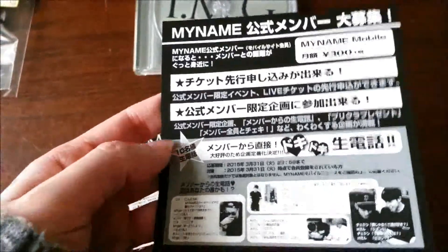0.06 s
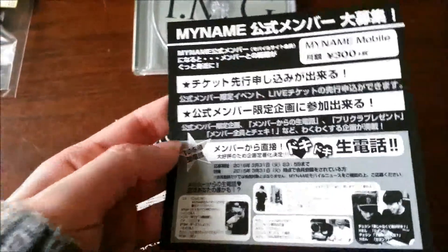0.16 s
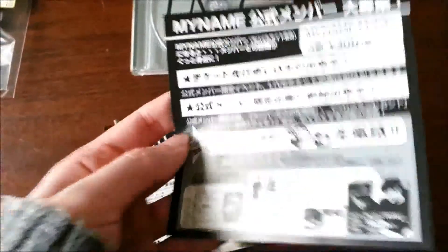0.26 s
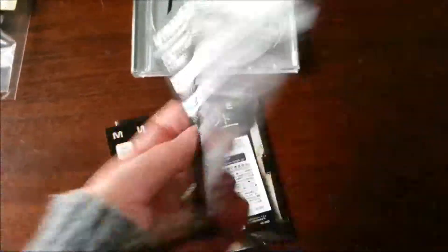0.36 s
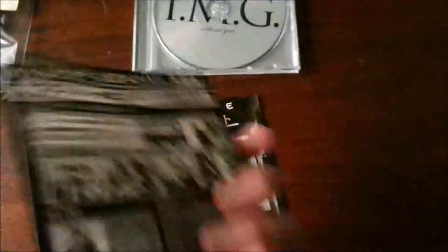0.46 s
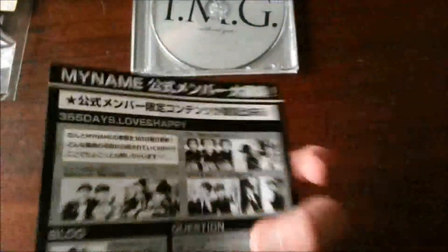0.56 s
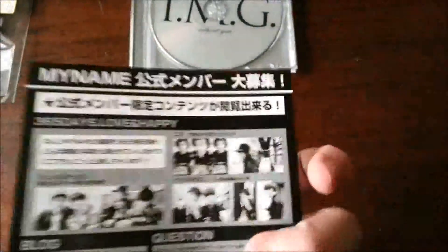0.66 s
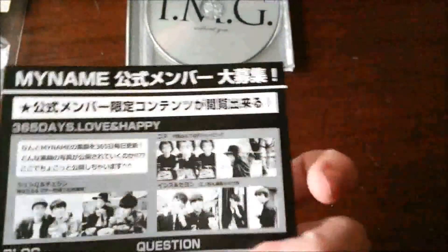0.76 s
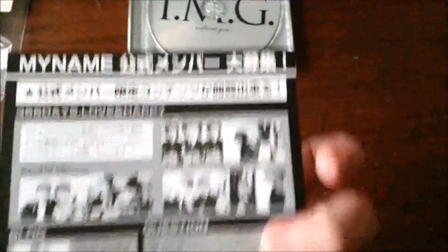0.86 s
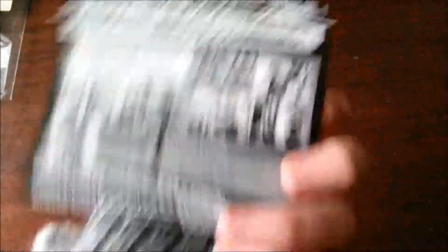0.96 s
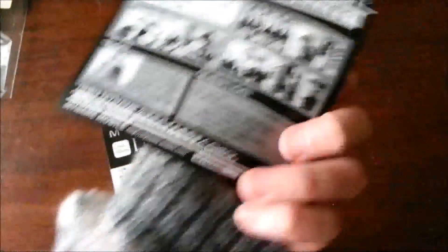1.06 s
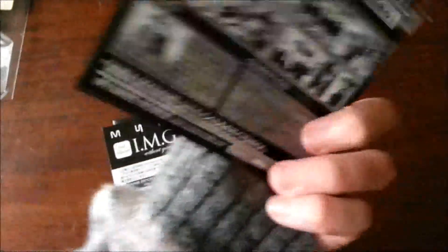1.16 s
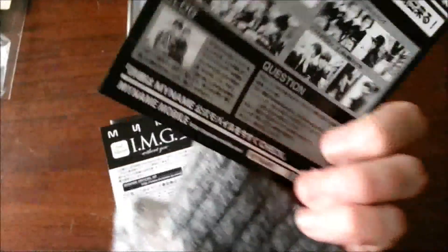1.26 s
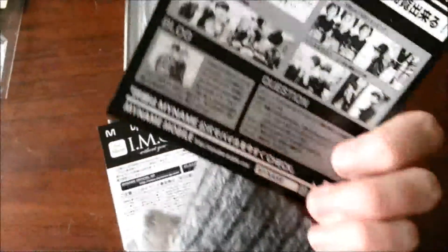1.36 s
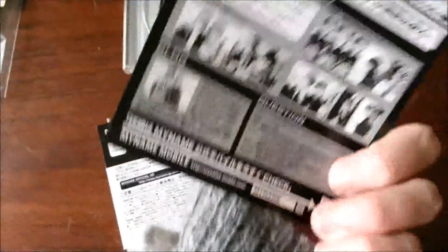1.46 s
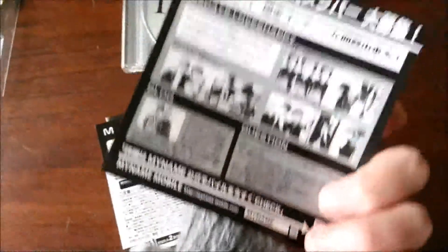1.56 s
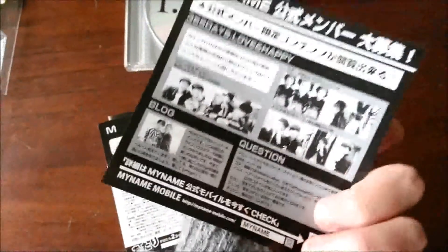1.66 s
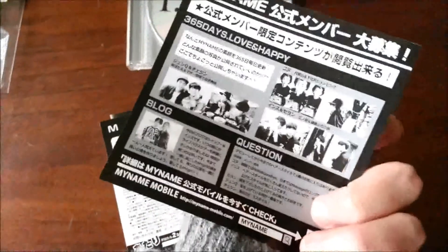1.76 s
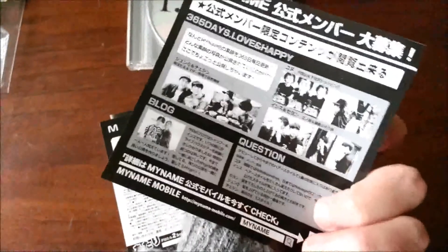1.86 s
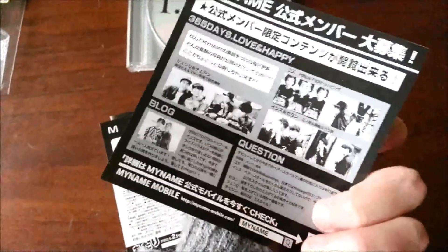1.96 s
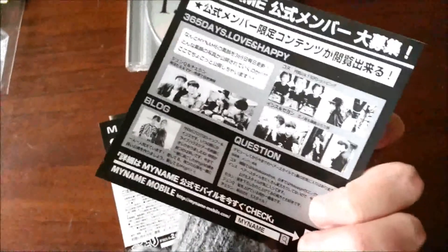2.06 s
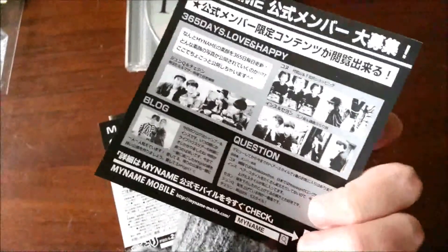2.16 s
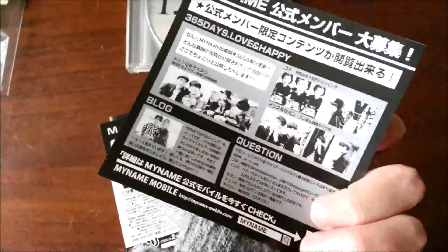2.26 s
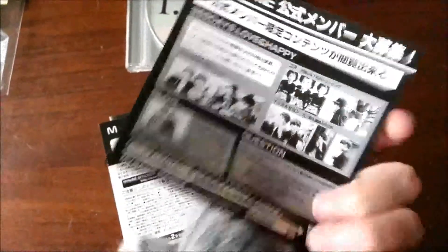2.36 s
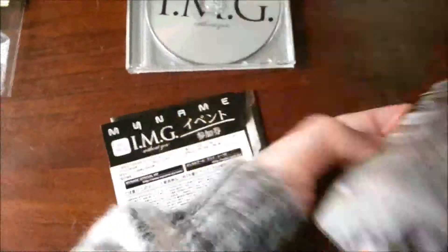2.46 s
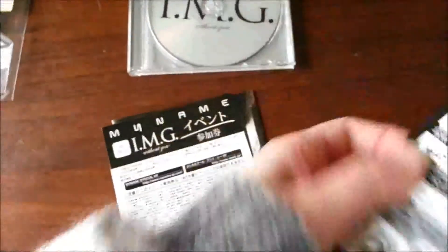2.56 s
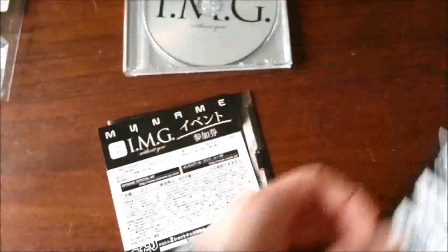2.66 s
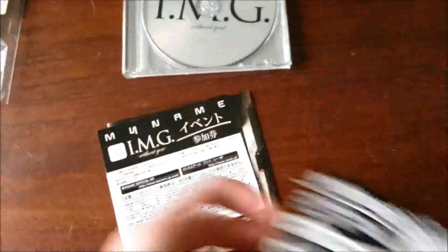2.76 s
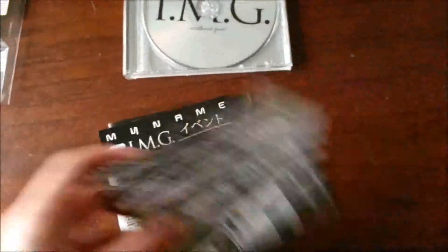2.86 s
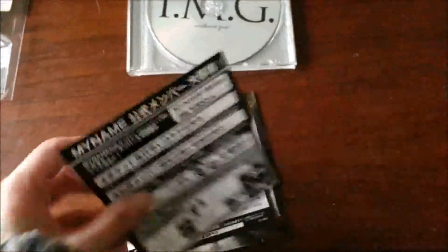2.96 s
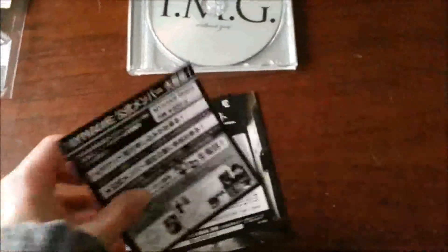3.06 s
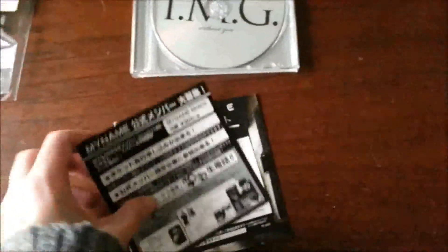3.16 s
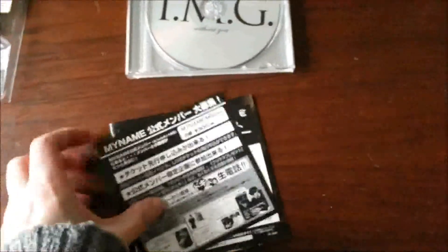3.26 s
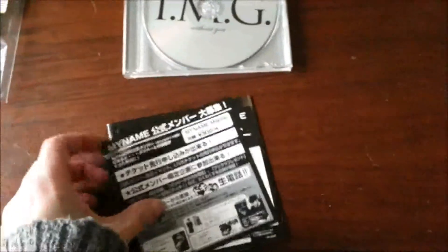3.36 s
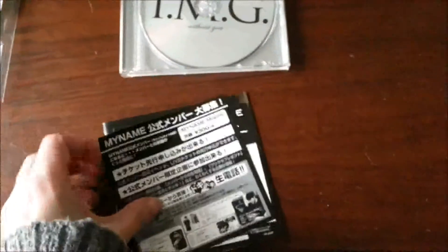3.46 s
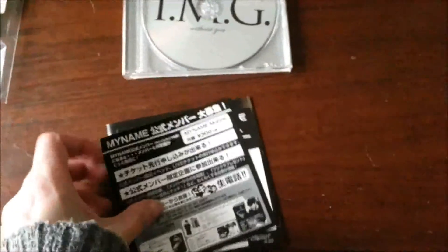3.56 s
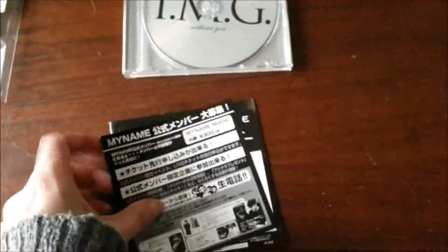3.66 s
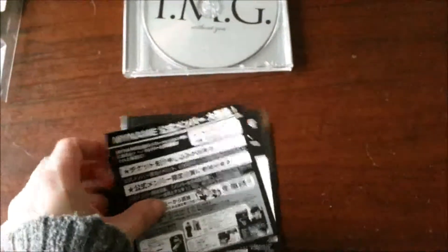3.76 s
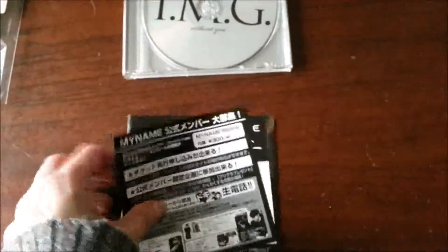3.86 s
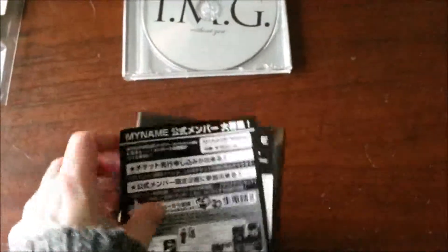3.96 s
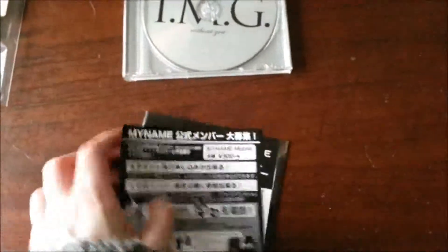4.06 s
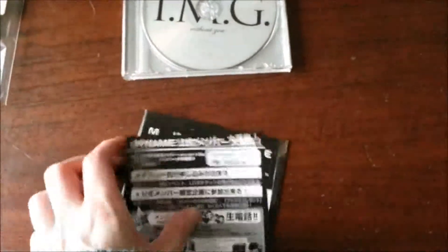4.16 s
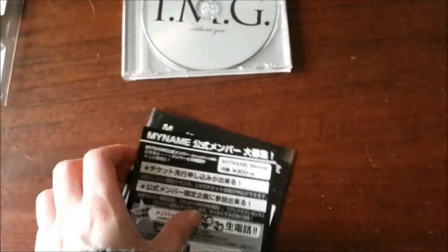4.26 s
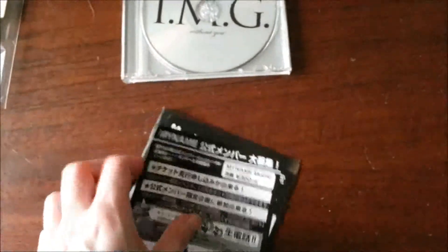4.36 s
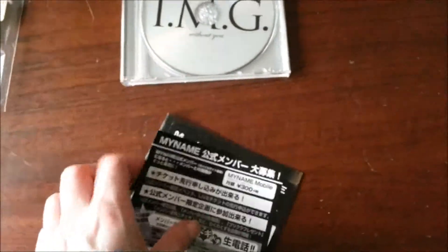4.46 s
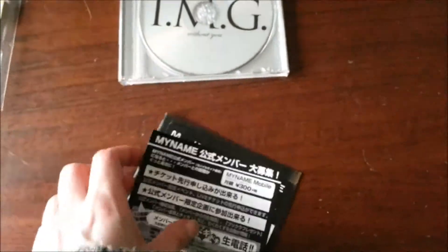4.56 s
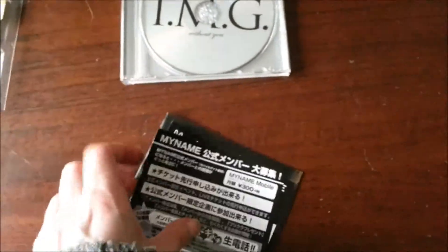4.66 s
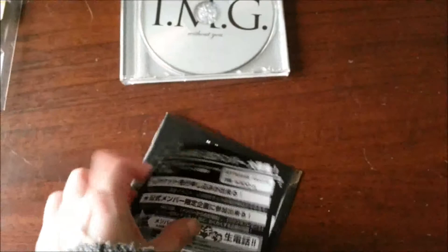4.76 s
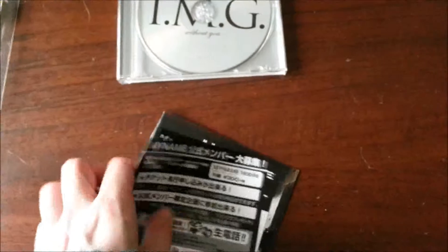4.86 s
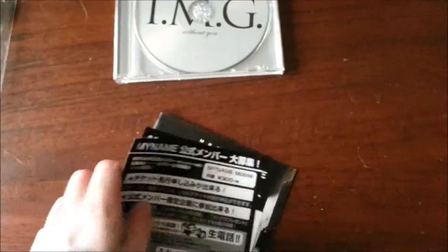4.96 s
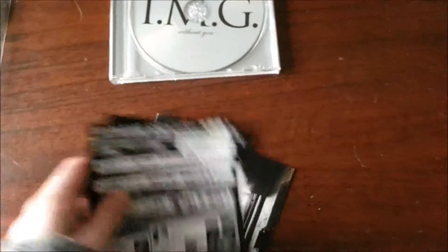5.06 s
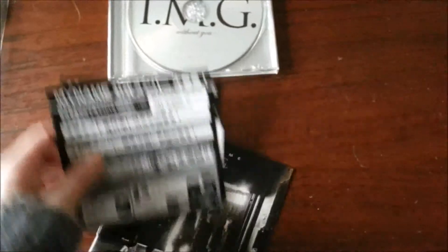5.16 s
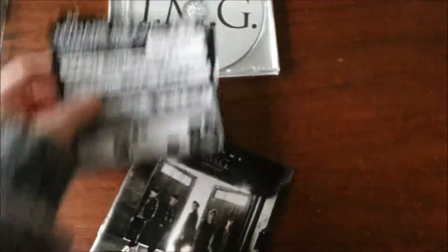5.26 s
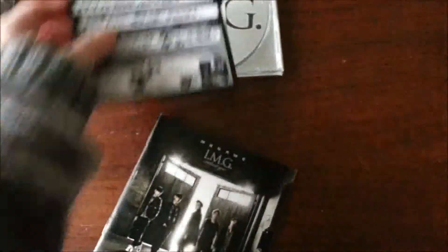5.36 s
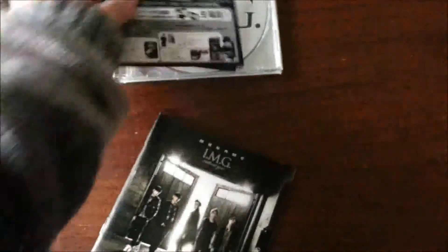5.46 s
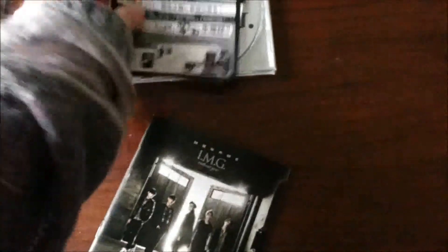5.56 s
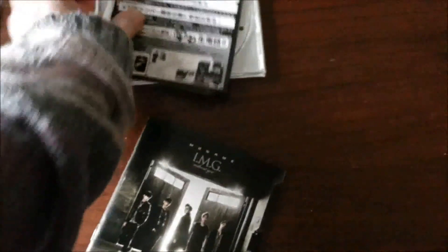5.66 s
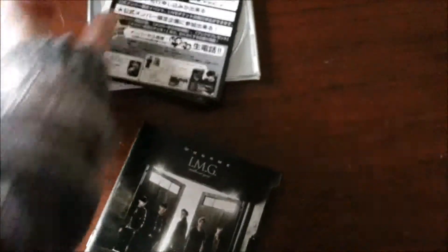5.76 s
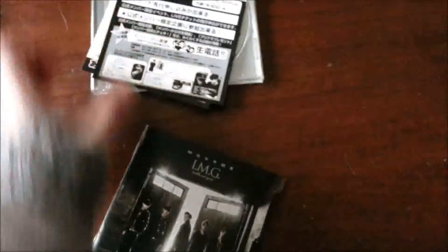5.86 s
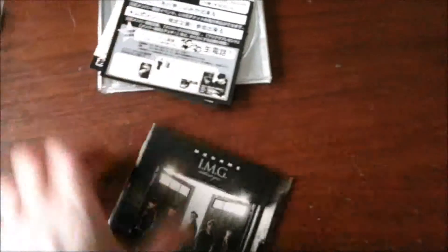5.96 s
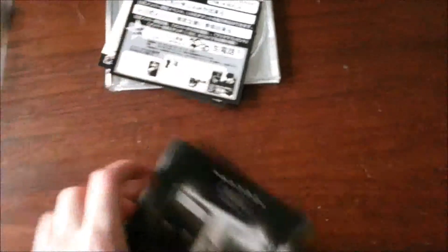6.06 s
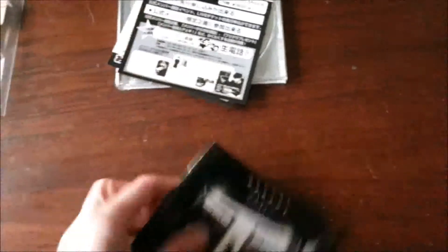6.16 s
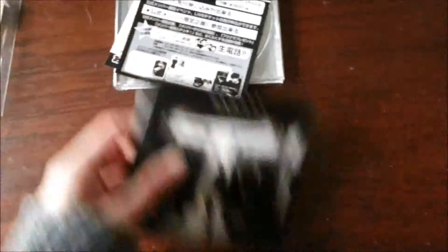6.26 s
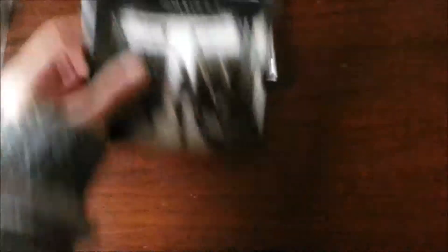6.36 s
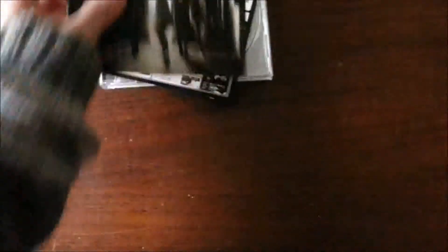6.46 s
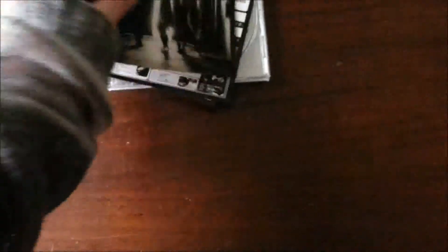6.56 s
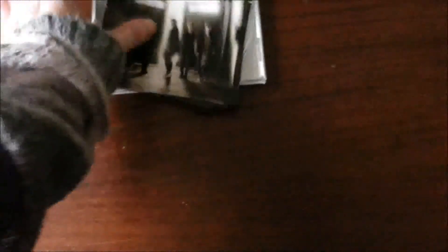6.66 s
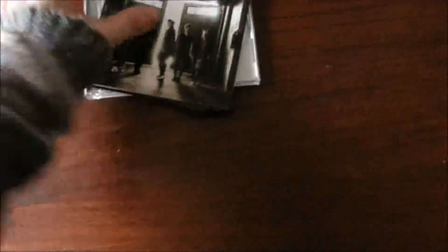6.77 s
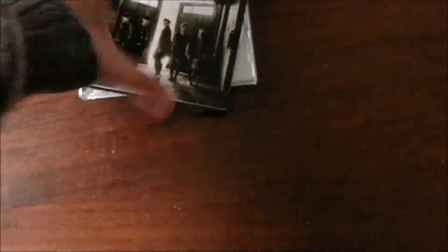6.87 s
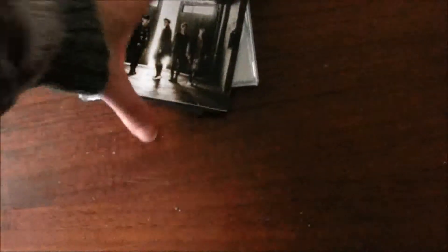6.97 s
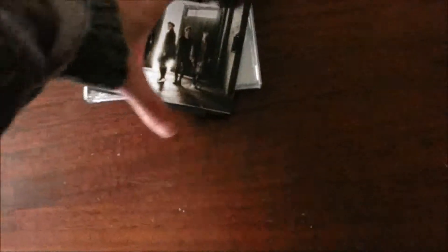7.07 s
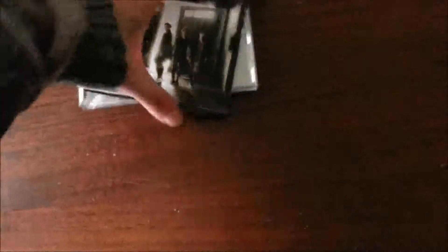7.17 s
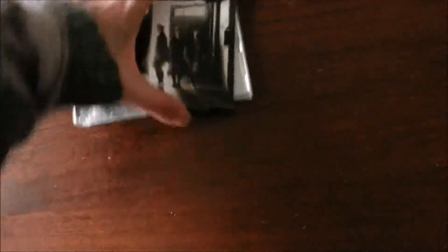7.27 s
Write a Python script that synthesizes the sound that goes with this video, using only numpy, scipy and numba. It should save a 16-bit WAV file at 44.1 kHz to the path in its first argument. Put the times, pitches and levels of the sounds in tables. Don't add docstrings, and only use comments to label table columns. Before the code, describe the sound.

Close handling of leaflets: crisp crackling bends, quiet pauses, soft sliding on wood, a fast edge riffle, and a final bright slap on plastic.

```python
import sys
import numpy as np
from scipy import signal
from scipy.fft import rfft, irfft, next_fast_len
from scipy.io import wavfile
from scipy.ndimage import uniform_filter1d, map_coordinates
from numba import njit

SR = 44100
rng = np.random.default_rng(int(sys.argv[2]) if len(sys.argv) > 2 else 0)


def bounce(signal):
    frames = np.transpose(np.atleast_2d(signal))
    limited = np.clip(frames, -1, 1)
    pcm = np.round(limited * 32767).astype(np.int16)
    wavfile.write(sys.argv[1], SR, pcm)


def amplitude_ratio(level_db):
    exponent = np.asarray(level_db, float) / 20
    return 10 ** exponent


N = 322589

# (centre [Hz], width [Hz], level [dB])
SHEET_MODES = [(1800, 900, -7.5), (2480, 240, 3.5)]
# (centre [Hz], width [Hz], level [dB])
EDGE_MODES = [(3500, 600, 4), (4300, 1500, -4), (5500, 800, -3)]
# (centre [Hz], width [Hz], level [dB])
FLEX_MODES = [(393, 293, 1.5), (800, 350, 2), (1340, 560, -3)]
# (time of peak [s], rubbing level [dB], rise [s], fall [s], crispness [dB])
CRUMPLES = [(0.466, -55, 0.012, 0.015, -7), (0.516, -49, 0.037, 0.013, 0),
            (0.526, -32.5, 0.011, 0.0099, -3.5), (0.586, -34, 0.12, .012, -8.5),
            (0.596, -37, .006, 0.092, -10), (0.632, -35, 0.039, 0.023, 2), (0.785, -38, 0.035, 0.016, -6),
            (0.845, -42.5, 0.013, 0.13, -5), (1.09, -50, 0.087, 0.13, -6), (1.19, -43, 0.0046, 0.086, -4),
            (1.25, -41, 0.071, 0.02, -0.5), (1.317, -56, 0.013, 0.26, -5.5), (2.52, -48.5, 0.02, .03, 3),
            (2.53, -34.5, 0.027, 0.032, -8), (2.672, -39.5, 0.032, .008, 2),
            (2.705, -34, 0.044, 0.0073, -1), (4.5, -29.5, 0.056, 0.013, -3), (4.85, -50, 0.0034, 0.055, 5),
            (4.884, -45, 0.034, 0.014, -8), (4.925, -24, 0.008, 0.016, -25), (7.31, -44, 0.023, .05, -2.5)]
# (time of peak [s], level [dB], rise [s], fall [s])
FLUTTERS = [
    (0.527, -38, 0.0057, 0.048),
    (0.6, -36, 0.15, 0.12),
    (0.745, -46.5, 0.01, 0.081),
    (1.145, -41, 0.055, 0.11),
    (1.19, -34, 0.018, 0.093),
    (1.32, -32.5, 0.03, 0.035),
    (2.53, -43, 0.047, 0.013),
    (2.71, -42.5, 0.13, 0.031),
]
# (time of peak [s], scrape level [dB], rise [s], fall [s], air-gap resonance [Hz])
SLIDES = [(0.02, -57.5, 0.021, 0.062, 2594), (2.478, -48.5, 0.032, 0.06, 3040),
          (2.55, -44, 0.0072, 0.32, 1950), (2.615, -40, 0.05, 0.017, 3500),
          (2.82, -51.5, 0.48, 0.035, 2020), (3.345, -45.5, 0.02, 0.057, 2000),
          (3.04, -42.5, 0.21, 0.0059, 1340), (3.157, -48.5, 0.009, 0.15, 2250),
          (3.28, -50.5, 0.023, 0.12, 1900), (3.582, -43, 0.0055, 0.056, 2530),
          (3.8, -52.5, 0.91, 0.5, 2560), (4.12, -51.5, 0.47, 0.14, 3100), (4.355, -54.5, 0.023, 0.16, 2460),
          (4.53, -55, 0.019, 0.14, 2450), (4.656, -53.5, 0.075, 0.079, 2180),
          (4.993, -36.5, 0.14, 0.015, 3400), (5.012, -45.5, .005, 0.11, 3040),
          (5.19, -50.5, 0.14, 0.16, 2000), (5.702, -40.5, 0.0098, 0.025, 3140),
          (5.765, -47, 0.13, 0.021, 1920), (5.778, -43.5, 0.0076, 0.076, 3050),
          (6.23, -47, 0.12, 0.1, 2650), (6.3, -50, 0.04, 0.15, 1820), (6.79, -48.5, 0.14, 0.0088, 3580),
          (6.815, -32, 0.021, 0.043, 2930), (6.835, -42, .021, 0.12, 2750)]
# (time [s], level [dB], fall [s])
SETTLES = [(2.556, -31, 0.037), (2.752, -44.5, 0.099), (2.863, -30, 0.073), (2.91, -46.5, 0.41),
           (3.18, -54, 0.13), (4.53, -50.5, 0.073), (4.945, -58, 0.064), (5.008, -49.5, 0.18),
           (5.776, -44.5, 0.073), (6.143, -53, 0.1), (6.818, -40.5, 0.16)]
# (time of peak [s], level [dB], rise [s], fall [s])
BRUSHES = [
    (0.56, -37.5, 0.094, 0.022),
    (2.672, -28.5, 0.028, 0.027),
    (3.34, -48.5, 0.012, 0.086),
    (5.2, -56, 0.088, 0.064),
    (4.49, -44, 0.049, .04),
    (4.925, -35.5, 0.033, 0.033),
    (6.24, -45.5, 0.16, 0.024),
    (6.32, -45, 0.035, 0.049),
    (6.81, -36, .006, 0.063),
]
# (time [s], peak level [dB], pitch [Hz], crispness [dB])
HELD_TICKS = [(0.075, -38.5, 3240, -11), (0.457, -33.5, 1630, -18), (0.4687, -29, 2400, -19),
              (0.599, -16, 2460, -14), (0.6243, -31, 2500, -5), (0.6882, -20, 2830, -3.5),
              (0.752, -29.5, 2400, 2), (0.7612, -37, 2460, -3), (0.7766, -35, 2525, -1),
              (0.7843, -22, 2900, 5.5), (0.842, -27, 2730, -29), (0.848, -26.5, 2620, -11),
              (0.8692, -37, 2470, 14), (0.8864, -27, 2540, -1), (0.938, -30, 2620, 2),
              (1.094, -31, 2440, -22), (1.115, -31, 2420, -9), (1.2072, -24, 2370, -29),
              (1.2227, -32, 2440, -24), (1.25, -23.5, 2630, -24), (1.313, -25, 1240, -25),
              (2.5275, -25, 1650, -31), (2.6166, -33, 3600, -20), (2.672, -22, 2150, 9),
              (2.699, -19, 2670, -16), (2.705, -16.5, 2170, -28), (2.9498, -28, 2650, -3)]
# (time [s], peak level [dB], pitch [Hz], crispness [dB])
TABLE_TICKS = [(3.081, -33.5, 1300, -22), (3.1489, -23, 2120, 1), (3.237, -34, 1300, -7),
               (3.3344, -42, 1840, -17), (3.3912, -38, 2390, -12), (3.5332, -37, 4030, -5),
               (3.696, -47, 1930, -13), (3.786, -31, 2460, -1), (3.7982, -31, 2860, -20),
               (3.968, -29, 2870, -17), (3.9825, -30, 2740, -8), (4.236, -44, 4840, 5),
               (4.4541, -28, 1950, -11), (4.4722, -27, 2270, 5), (4.4976, -14.5, 3850, -9),
               (4.51, -22.5, 2200, -3), (4.5984, -36, 2230, -11), (4.6507, -36, 2000, 6),
               (4.6708, -28, 2300, -40), (4.8415, -23.5, 2450, -16), (4.8757, -27, 2880, -18),
               (5.1612, -31, 1870, -11), (5.1908, -32.5, 1870, 5), (5.7718, -32, 3400, -14),
               (6.698, -35, 2600, -14)]
# (time [s], peak level [dB], crispness [dB])
RIFFLE = [
    (4.8858, -18, -20),
    (4.893, -23, -13),
    (4.8976, -15, 12.5),
    (4.9049, -13, 13),
    (4.91, -17, -11),
    (4.9154, -14.5, 8),
    (4.9212, -15, -2),
    (4.9313, -22, -1),
]
# (time [s], peak level [dB], pitch [Hz], thump above peak [dB], crispness [dB])
KNOCKS = [(0.521, -19.5, 2480, -19, 9.5), (0.5901, -16.5, 2130, -5.5, -11), (0.6344, -10.5, 3080, -19, 0),
          (1.1335, -32, 2400, -6, -12), (1.1911, -21, 2330, -6.5, -22), (1.2438, -34.5, 2590, 3, -21),
          (1.7774, -10.5, 1900, -7.5, -8), (2.5373, -9, 1870, -5.5, -29), (2.538, -14.5, 3330, -33, -17),
          (2.813, -35, 1570, -11, -23), (2.8566, -19, 1960, -19, 7), (2.8646, -24, 980, -11, -18),
          (2.886, -35, 1340, 16, -22), (3.47, -53, 1840, 7, -68), (3.5702, -8, 2520, -30.5, -3),
          (3.83, -29, 2800, -13, 5), (5.0003, -16, 1690, -15, -12), (5.0037, -7, 3150, -20.5, -2.5),
          (6.1357, -23.5, 2200, -16, 5.5), (6.1722, -33.5, 2430, -12, -10), (6.147, -57, 685, 18, -25),
          (6.711, -29, 1130, -13, -1)]
# (time [s], peak level [dB], pitch [Hz], thump above peak [dB], crispness [dB])
CASE_TAPS = [
    (5.639, -42.5, 1900, -8, 7),
    (5.6981, -24, 1300, -14, -10),
    (6.653, -43.5, 3570, -7.5, -17),
    (6.8035, -14, 1170, -5.5, 8),
    (6.8033, -9, 2700, -27, -31),
]
# (time of peak [s], peak
# level [dB], pitch [Hz])
PANEL_POPS = [(0.864, -36, 4030), (0.4076, -45, 2300), (0.4485, -49, 4000), (0.5418, -37, 3220),
              (0.5637, -32, 2560), (0.5787, -32, 2540), (0.581, -27, 2520), (0.5937, -18.5, 2270),
              (0.6021, -38, 620), (0.6041, -20, 2520), (0.6091, -28, 2540), (0.614, -24, 2280),
              (0.6171, -25, 2260), (0.621, -33, 2260), (0.6251, -27, 2260), (0.641, -23, 3260),
              (0.645, -25, 2500), (0.648, -35, 2850), (0.651, -35, 2540), (0.685, -32, 3160),
              (0.6898, -27, 2500), (0.7523, -39, 2850), (0.7566, -40, 2830), (1.2075, -25, 3530),
              (0.775, -31, 2540), (0.7892, -33, 3180), (0.8516, -29, 2610), (0.863, -36, 2540),
              (0.867, -35, 2540), (0.8868, -41, 2540), (0.8925, -41, 2540), (0.897, -38, 2830),
              (0.9005, -38, 2540), (0.9036, -43, 2540), (0.9279, -40, 2450), (0.942, -35.5, 2380),
              (1.118, -38, 2500), (1.1386, -34, 400), (1.1653, -38, 474), (1.185, -35, 2500),
              (1.191, -31, 1170), (1.1961, -25.5, 2460), (1.2031, -25, 2450), (1.2137, -30, 1610),
              (1.2157, -31, 3230), (1.22, -31, 2380), (1.2237, -30, 3220), (1.2322, -38, 3570),
              (1.246, -27, 2530), (1.2565, -29, 3450), (1.2971, -44, 564), (1.3045, -37, 716),
              (1.3154, -38, 407), (1.319, -31, 1600), (1.3217, -29, 1260), (1.3275, -31.5, 1290),
              (1.3323, -37, 1410), (1.335, -39, 405), (1.34, -42, 950),
              (2.5312, -17.5, 1800), (2.532, -21, 3600), (2.5332, -27, 726), (2.5389, -16, 3860),
              (2.5398, -14, 2280), (2.5407, -17, 702), (2.5615, -41, 890), (2.5662, -30, 700),
              (2.663, -35, 4530), (2.6699, -35, 2260), (2.6699, -32, 4500), (2.6734, -34, 710),
              (2.694, -34, 2560), (2.703, -19, 2770), (2.857, -25, 6320), (2.86, -27, 800),
              (2.861, -27, 2060), (2.8715, -28, 590), (2.8775, -25, 920), (2.8854, -30, 674),
              (2.8919, -30, 820), (2.8969, -27, 674), (2.9648, -39, 3200), (2.985, -38, 5200),
              (3.0082, -37.5, 1290), (3.0161, -38.5, 925), (3.023, -42, 1130), (3.0286, -37.5, 3330),
              (3.0357, -37.5, 1400), (2.6185, -28, 3700), (4.3538, -49, 2270), (4.4559, -32, 2550),
              (4.4773, -35, 2260), (4.4838, -34, 2280), (4.4848, -34, 5700), (2.912, -36, 686),
              (4.4914, -34, 5970), (4.506, -24, 3590), (4.5103, -35, 3590), (4.5257, -40, 4030),
              (4.8997, -14, 5650), (4.903, -19, 2830), (4.9077, -12, 5830), (4.9228, -21, 5700),
              (5.7, -28.5, 3460), (5.6999, -30, 1250), (5.715, -39, 2850), (5.716, -38, 1280),
              (5.772, -32, 1184), (5.7729, -20, 3450), (5.7802, -41, 1160), (5.7839, -35, 3200),
              (5.7924, -39, 1280), (6.806, -11.5, 1220), (6.8287, -29, 1130), (6.833, -35, 2870),
              (6.8486, -31.5, 1010), (6.8519, -37, 2840),
              (0.5981, -24, 3560), (0.6298, -20, 2500), (0.6316, -23, 2870), (0.6356, -12, 3460),
               (1.2085, -31, 1560), (1.2522, -40, 635), (1.303, -45, 1260), (1.326, -40, 2480),
               (1.331, -42, 2500), (1.327, -39, 3200), (2.5128, -37, 1410), (2.5193, -35, 1590),
               (2.535, -32, 298), (2.6944, -35, 4490), (2.6984, -40, 5660), (2.8685, -35, 5000),
               (3.2252, -39, 1235), (3.345, -43, 1990), (3.3664, -38, 2400), (3.5644, -37, 4000),
               (3.5711, -19.5, 5480), (3.5839, -33, 2520), (4.4785, -41.5, 440), (4.4983, -23, 2150),
               (4.8724, -27, 3530), (4.89, -24, 5700), (4.8915, -20, 3170), (4.8989, -22, 3170),
               (4.9063, -18, 2520), (5.0059, -29, 487), (5.0216, -41, 890), (5.6945, -40, 1300),
               (5.82, -40, 3000), (6.143, -40, 350), (6.152, -35.5, 343), (6.1777, -38.5, 457),
               (6.228, -40, 2300), (6.266, -44, 2400), (6.805, -17, 3600), (6.8054, -27, 490),
               (6.6545, -38, 3760), (6.711, -35, 3400), (5.7775, -23.5, 3080), (1.781, -24.5, 1350),
               (3.34, -36.5, 5300), (0.682, -31, 2630), (3.088, -39, 1300)]
# (time [s], level [dB])
THUDS = [
    (0.49, -50),
    (0.749, -52),
    (6.141, -49),
    (6.801, -40),
]
# (time [s], left minus right [dB], left delay [samples])
HANDS = [(0.0, -21.5, 4.9), (0.26, -2.0, 4.9), (0.96, -6.5, 2.1), (1.08, -9.5, 3.8), (1.44, -2.5, 0.65),
         (1.75, -7, 1.6), (2.81, -4, 2.42), (3.26, -6.5, 3.4), (5.21, -4, 4.14), (5.27, -8.5, 3.6),
         (7.31, -5, 3.7)]
# (frequency [Hz], left minus right [dB])
PORT_DB = [(60, -1), (200, 13.5), (380, 5), (1290, 4), (2380, 0), (4400, 15.5), (8120, 14), (15000, 12)]
# (frequency [Hz], left lead [rad])
PORT_TURN = [(0, 0.5), (1000, -.5), (2000, -0.44), (4800, 1.22), (7000, 0), (15500, -5)]
# (centre [Hz], t60 [s], level [dB])
ROOM = [(500, 0.42, -16), (990, 0.44, -16), (2300, 0.32, -16), (4150, 0.73, -24.5), (11300, 0.32, -10.5),
        (2200, 0.028, 3.5), (5000, 0.018, 1), (11000, 0.013, 7)]
# (frequency [Hz], level per Hz [dB])
HISS = [(15, -61), (25, -30.5), (189, -10), (400, -15), (815, -19.5), (3430, -25.5), (5680, -33),
        (14400, -29)]
# (time [s], level [dB])
DRONE = [(0.0, -56.5), (0.43, -77), (0.65, -51.5), (0.96, -64), (1.32, -53.5), (1.49, -59.5), (2.22, -76),
         (2.69, -63.5), (3.85, -65), (4.68, -68.5), (5.21, -60.5), (5.42, -55.5), (6.03, -51),
         (6.43, -64.5), (6.74, -52.5), (7.31, -66.5)]

HISS_DB = -55.5
RIFFLE_HZ = 3050
HELD_THUMP_DB, TABLE_THUMP_DB, RIFFLE_THUMP_DB = -18.5, -24.5, -23
PAPER_CRACK_DB, CRACK_PER_CRISP, CASE_CRACK_DB = -10, 0.6, -4
PAPER_T60_S, CASE_T60_S = .0155, .034
CREAK_S, CREAK_DB = .002, -31
SETTLE_RISE_S = 0.014
STROKE_CURVE = 1.6
BENT_FLEX_DB, FLAT_FLEX_DB = -12.5, -9.5
SKIN_POWER, BENT_SKIN_DB, FLAT_SKIN_DB = 0.65, -27.5, -18.5
WANDER = .035
POP_CYCLES, POP_DB, FLAP_HZ = 2.525, 0.3, 1300
PANEL_ROOM_DB = -4.5
THUD_HZ, THUD_T60_S = 93, 0.12


def level(x, db):
    return x * amplitude_ratio(db) / np.sqrt(np.mean(x ** 2))


def band(x, lo_hz, hi_hz):
    edges = [lo_hz, min(hi_hz, .45 * SR)]
    return signal.lfilter(*signal.butter(2, edges, "band", fs=SR), x + 1e-12)


def shape(x, response):
    size = next_fast_len(N)
    return irfft(rfft(x, size) * response(np.fft.rfftfreq(size, 1 / SR)), size)[..., :N]


def ring(x, modes):
    out = 0
    for k, (hz, width, db) in enumerate(modes):
        out = out + (-1) ** k * amplitude_ratio(db) * signal.lfilter(*signal.iirpeak(hz, hz / width, SR), x)
    return out


@njit
def sweep(x, hz, sharp):
    y, b, l = np.empty(len(x)), 0., 0.
    for i in range(len(x)):
        g = np.tan(np.pi * hz[i] / SR)
        v = (b + g * (x[i] - l)) / (1 + g * (g + 1 / sharp))
        b, l, y[i] = 2 * v - b, l + 2 * g * v, v / sharp
    return y


def wobble(x, modes, bend):
    out = 0
    for k, (hz, width, db) in enumerate(modes):
        out = out + (-1) ** k * amplitude_ratio(db) * sweep(x, hz * bend, hz / width)
    return out


def walk(rate):
    k = int(SR / rate)
    return uniform_filter1d(rng.standard_normal(4096)[np.arange(N) // k % 4096], k)


def strokes(rows):
    t = np.arange(0, N + 32, 32) / SR
    s, db, rise, fall, last = (np.array(rows)[:, [k]] for k in (0, 1, 2, 3, -1))
    away = np.where(t < s, (s - t) / np.abs(rise), (t - s) / np.abs(fall))
    power = amplitude_ratio(2 * np.maximum(db - 20 * away ** STROKE_CURVE, -200))
    total = power.sum(axis=0)
    blend = (power * last).sum(axis=0) / total
    return (np.interp(np.arange(N) / SR, t, c) for c in (np.sqrt(total), blend))


def crackle(rate, spread_db):
    when, size, sign = rng.random(N), rng.exponential(size=N), rng.standard_normal(N)
    return (when < rate / SR) * amplitude_ratio(spread_db * np.minimum(size, 4)) * sign


def crumple():
    (gain, edge_db), (bend, _) = strokes(CRUMPLES), strokes(FLUTTERS)
    stutter = 2.8 * walk(170)
    fibres = crackle(2600, 2.9)
    shift = 1 + WANDER * walk(22)
    rub = level(amplitude_ratio(stutter) * wobble(fibres, SHEET_MODES, shift), -3.0)
    flex = level(amplitude_ratio(0.6 * stutter + 2.4 * walk(60)) * ring(crackle(1500, 1.75), FLEX_MODES), -2.5)
    edge = level(amplitude_ratio(0.32 * stutter) * wobble(fibres, EDGE_MODES, shift), 1.0)
    skin = level(amplitude_ratio(0.34 * stutter) * band(crackle(7000, 0.59), 7600, 11400), BENT_SKIN_DB)
    flex_gain = np.hypot(bend, amplitude_ratio(BENT_FLEX_DB) * gain)
    return gain * (rub + amplitude_ratio(edge_db) * edge) + flex_gain * flex + gain ** SKIN_POWER * skin


def snaps():
    paper = [(s, db, hz, HELD_THUMP_DB, crisp) for s, db, hz, crisp in HELD_TICKS]
    paper += [(s, db, hz, TABLE_THUMP_DB, crisp) for s, db, hz, crisp in TABLE_TICKS]
    paper += [(s, db, RIFFLE_HZ, RIFFLE_THUMP_DB, crisp) for s, db, crisp in RIFFLE]
    paper += KNOCKS
    rows = [(*row, PAPER_CRACK_DB + CRACK_PER_CRISP * min(row[-1], 0), PAPER_T60_S) for row in paper]
    rows += [(*row, CASE_CRACK_DB, CASE_T60_S) for row in CASE_TAPS]
    out, t = np.zeros(N + 1536), np.arange(-256, 1280) / SR
    chance = rng.standard_normal((128, 1536))
    for (s, db, hz, thump_db, edge_db, crack_db, t60), noise in zip(rows, chance):
        click = 2.73 * (np.arange(1536) == 256 + 16)
        release = .5 * noise * np.clip(t / 0.0009, 0, 1) + click
        creak = amplitude_ratio(CREAK_DB) * noise * np.exp(np.minimum(t, 0) / CREAK_S) * (t < 0)
        # low [Hz], high [Hz], above peak [dB], share of t60
        parts = ((400, 1000, thump_db + 2.5, 2.4), (hz / 1.37, hz * 1.353, 1.2, 1.1),
                 (3500, 6600, edge_db - 6.0, .6), (7600, 14000, crack_db, .35))
        for lo_hz, hi_hz, above_db, lasts in parts:
            decay = np.exp(-np.log(1000) * np.abs(t) / (lasts * t60))
            wave = band(creak + release * decay, lo_hz, hi_hz)
            start = int(s * SR) - 256
            out[start:start + 1536] += wave * amplitude_ratio(db + above_db) / np.max(np.abs(wave))
    return out[:N]


def pops():
    out, t = np.zeros(N + 2048), np.arange(2048) / SR
    turns = np.tile(rng.random(128), 2)
    for (s, db, hz), turn in zip(PANEL_POPS, turns):
        rise_s = POP_CYCLES / hz * min(1, np.sqrt(hz / FLAP_HZ))
        age = t / rise_s
        start = int((s - rise_s) * SR)
        swell = amplitude_ratio(db + POP_DB) * age * np.exp(1 - age)
        out[start:start + 2048] += swell * np.sin(2 * np.pi * (hz * t + turn))
    return out[:N]


def slide():
    gain, hz = strokes(SLIDES)
    settle, _ = strokes([(s, db, SETTLE_RISE_S, fall) for s, db, fall in SETTLES])
    brush, _ = strokes(BRUSHES)
    friction = rng.standard_normal((3, N)) * amplitude_ratio(3 * walk(70))
    air_gap = level(sweep(friction[0], hz * (1 + .04 * walk(30)), 4.2), -3.5)
    scrape = air_gap + level(band(friction[0], 1200, 5000), -6.5)
    flex = level(ring(friction[1], FLEX_MODES) * amplitude_ratio(0.98 * walk(30)), -1.1)
    skin = level(band(friction[2], 6500, 12900), -7.0) + level(band(friction[2], 4700, 7200), -14.5)
    flex_gain = np.hypot(settle, amplitude_ratio(FLAT_FLEX_DB) * gain)
    skin_gain = np.hypot(brush, amplitude_ratio(FLAT_SKIN_DB) * gain ** SKIN_POWER)
    return gain * scrape + flex_gain * flex + skin_gain * skin


def thuds():
    t = np.arange(N) / SR
    push = 0
    for s, db in THUDS:
        push = push + amplitude_ratio(db) * (t > s) * np.exp(-np.log(1000) * np.abs(t - s) / THUD_T60_S)
    return push * level(ring(rng.standard_normal(N), [(THUD_HZ, 70, 0)]), 0)


def ports(x):
    hz, db = np.transpose(PORT_DB)

    def half(f):
        shade = amplitude_ratio(np.interp(np.log(f + 1), np.log(hz), db) / 2)
        return shade * np.exp(.5j * np.interp(f, *np.transpose(PORT_TURN)))

    left, right = shape(x, lambda f: np.array([half(f), 1 / half(f)]))
    s, pan_db, lag = np.transpose(HANDS)
    pan_db, lag = (np.interp(np.arange(N) / SR, s, c) for c in (pan_db, lag))
    sway = walk(14)
    pan_db = pan_db + 2.5 * sway[::-1]
    left = map_coordinates(left, [np.arange(N) - lag - 2.2 * sway], order=3)
    return np.array([left, right]) * amplitude_ratio([pan_db / 2, -pan_db / 2])


def room(x):
    t = np.arange(int(.6 * SR)) / SR
    tail = 0
    for hz, t60, db in ROOM:
        noise = band(rng.standard_normal((2, len(t))), hz / 1.5, hz * 1.5)
        tail = tail + amplitude_ratio(db) * noise * np.exp(-np.log(1000) * t / t60)
    onset = np.clip((t - .004) / 0.00065, 0, 1)
    return signal.fftconvolve(x[None], tail * onset / 20, axes=1)[:, :N]


def background():
    hz, db = np.transpose(HISS)
    noise = rng.standard_normal((2, N))
    noise = noise + 0.21 * band(noise[::-1], 53, 450)
    hiss = shape(noise, lambda f: amplitude_ratio(np.interp(np.log(f + 1), np.log(hz), db)))
    drone = ring(rng.standard_normal(N), [(181.0, 50, 8.2), (246, 215, 2.8)])
    drone = ring(drone, [(195, 66, 0)]) * amplitude_ratio(1.5 * walk(8))
    swell = amplitude_ratio(np.interp(np.arange(N) / SR, *np.transpose(DRONE)))
    return level(hiss, HISS_DB + 2.0) + swell * level(drone, -2.5)


def scene():
    rustle = band(crumple() + slide() + snaps(), 74, 21000)
    panels = band(pops(), 74, 21000)
    reflections = room(rustle + amplitude_ratio(PANEL_ROOM_DB) * panels)
    return ports(rustle + panels) + reflections + background() + thuds()


def top_cut(x):
    return signal.sosfilt(signal.butter(12, 15810, fs=SR, output="sos"), x)


def record(dry):
    top = shape(dry, lambda f: amplitude_ratio(np.interp(f, [14540, 14700, 16000, 16600], [0.5, -19, -34, -65.5])))
    return top_cut(np.clip(top, -1, 1))


dry = scene()
out = record(dry)
bounce(out)
```